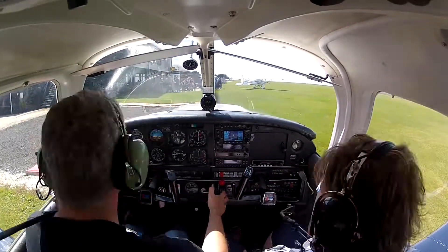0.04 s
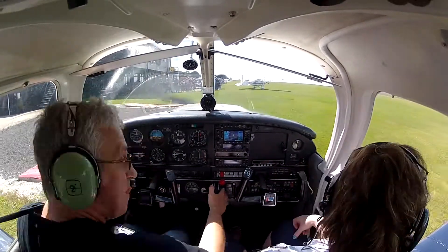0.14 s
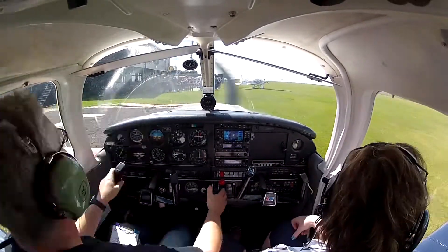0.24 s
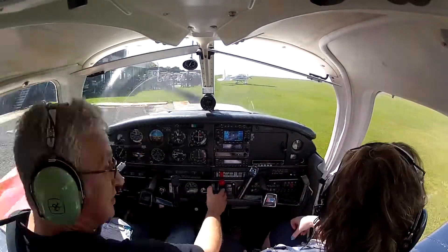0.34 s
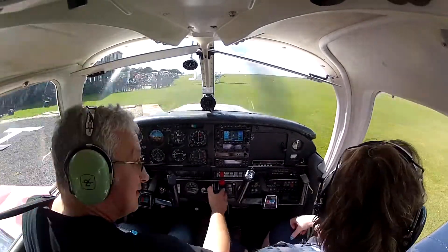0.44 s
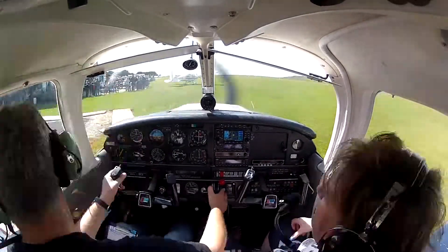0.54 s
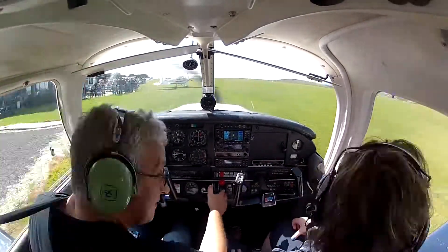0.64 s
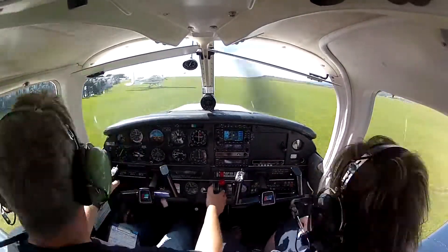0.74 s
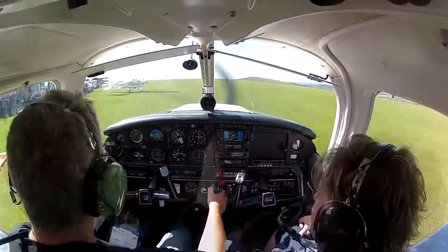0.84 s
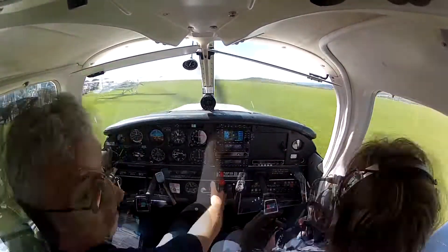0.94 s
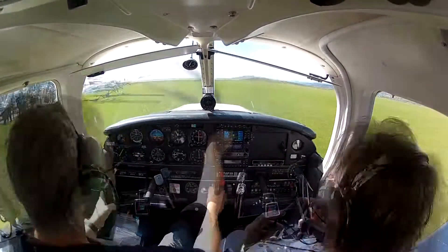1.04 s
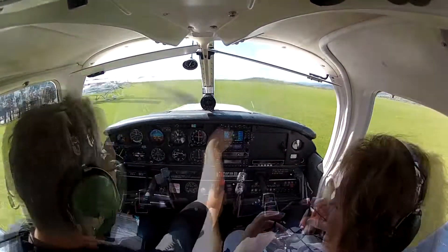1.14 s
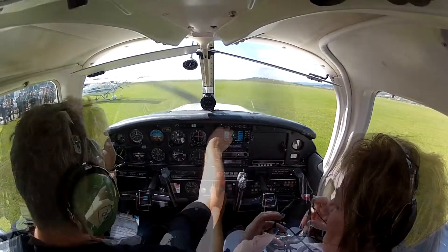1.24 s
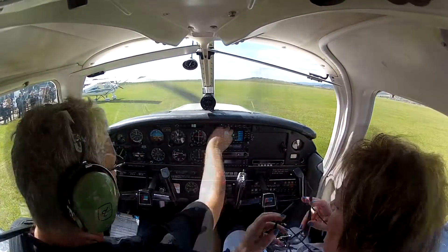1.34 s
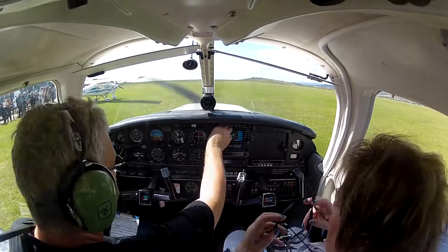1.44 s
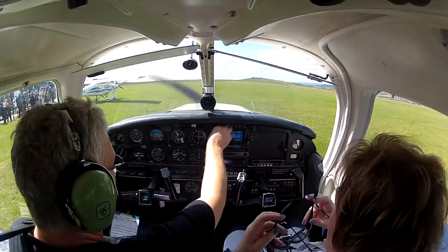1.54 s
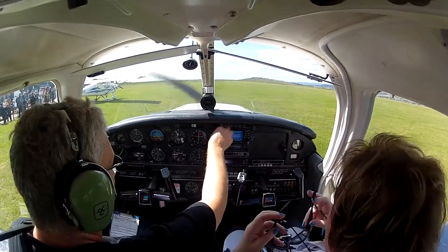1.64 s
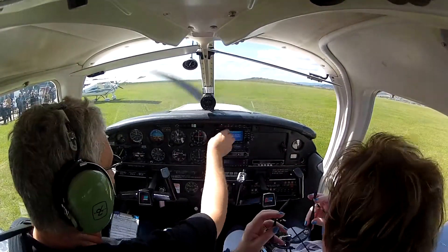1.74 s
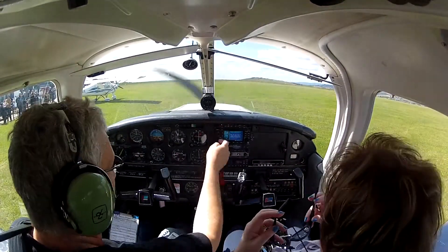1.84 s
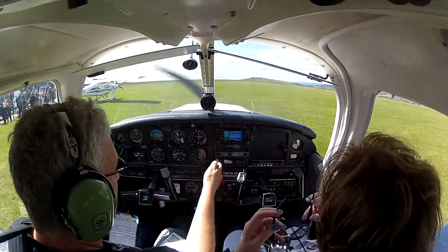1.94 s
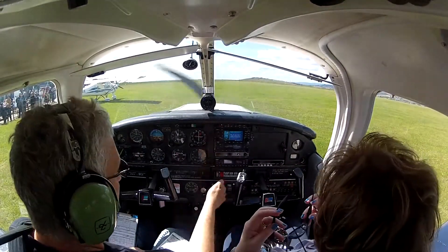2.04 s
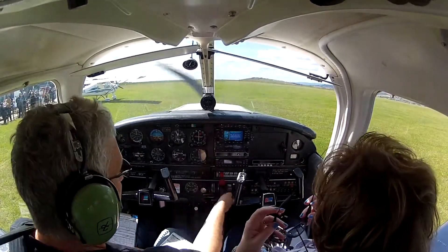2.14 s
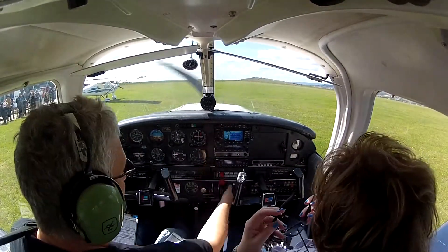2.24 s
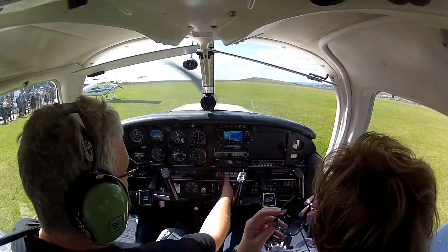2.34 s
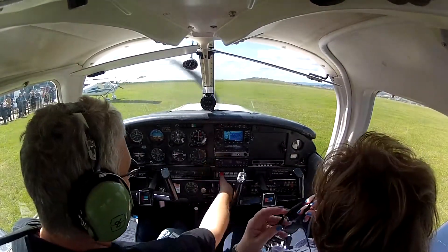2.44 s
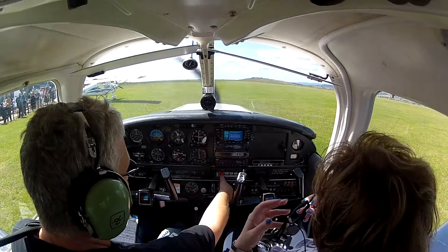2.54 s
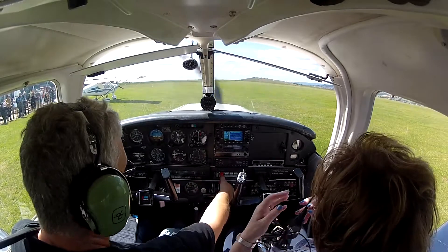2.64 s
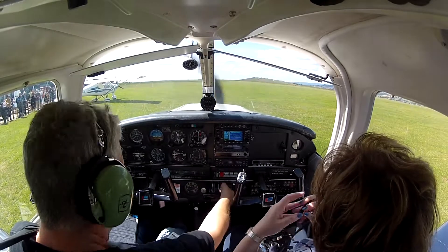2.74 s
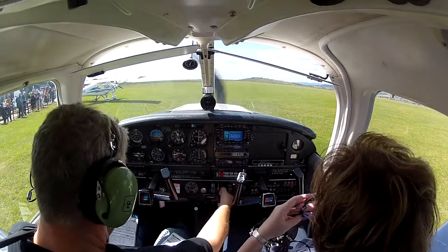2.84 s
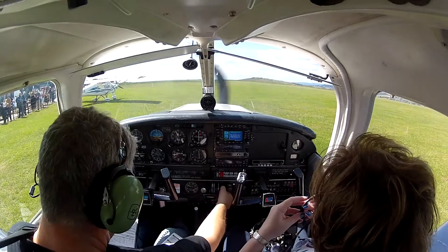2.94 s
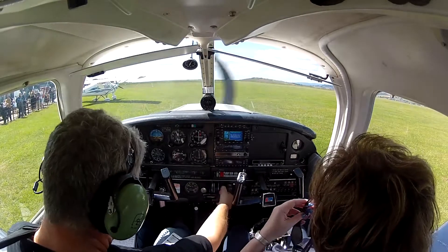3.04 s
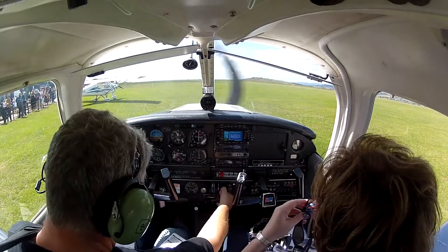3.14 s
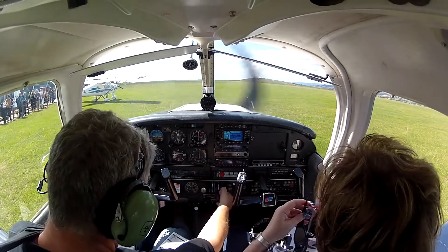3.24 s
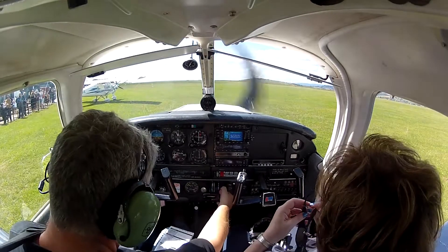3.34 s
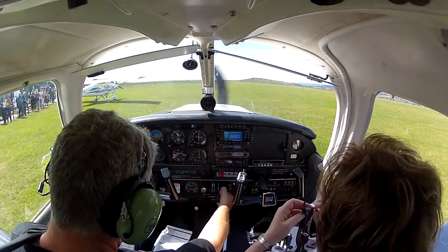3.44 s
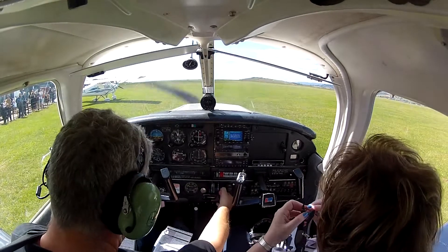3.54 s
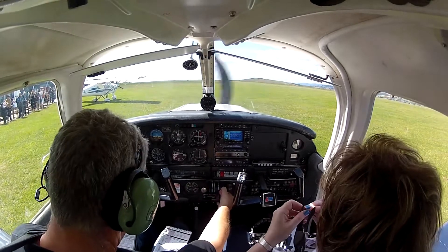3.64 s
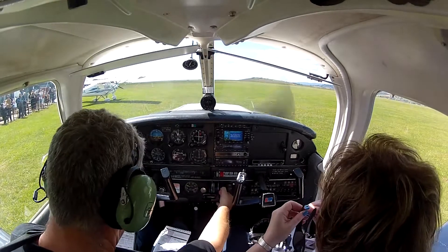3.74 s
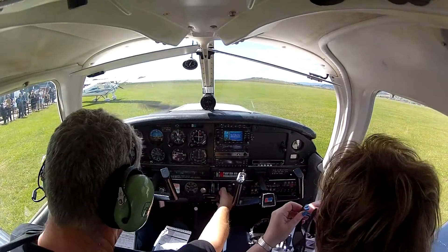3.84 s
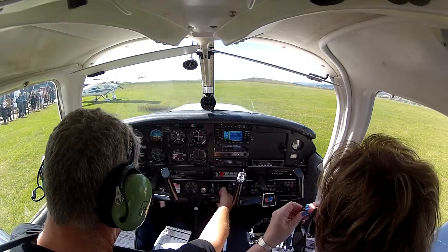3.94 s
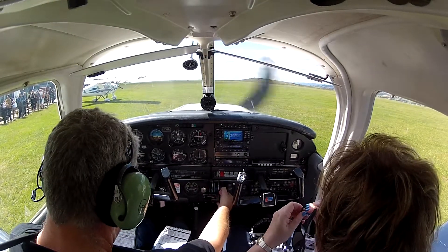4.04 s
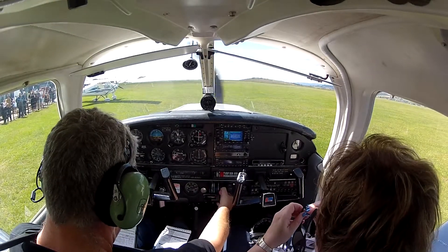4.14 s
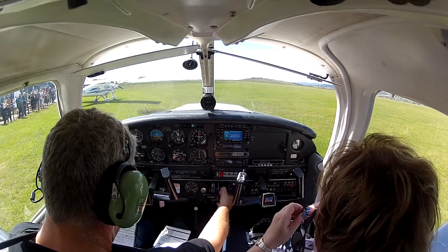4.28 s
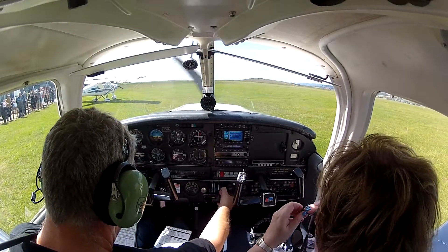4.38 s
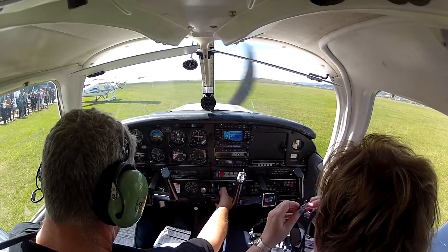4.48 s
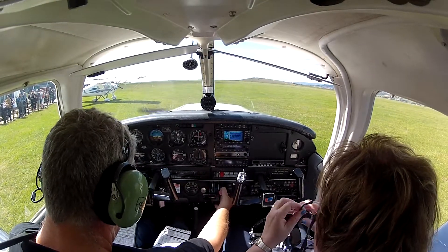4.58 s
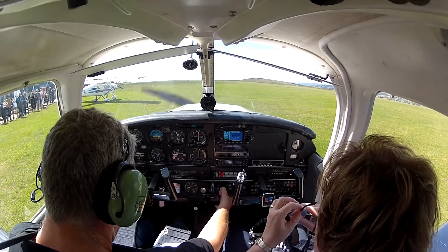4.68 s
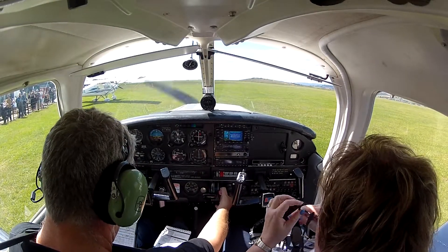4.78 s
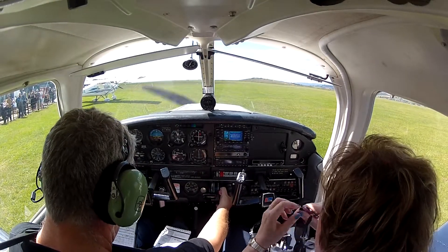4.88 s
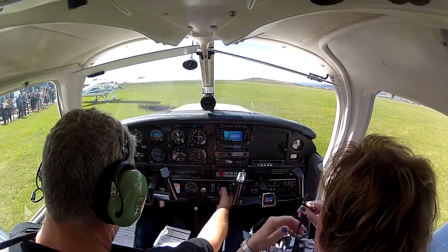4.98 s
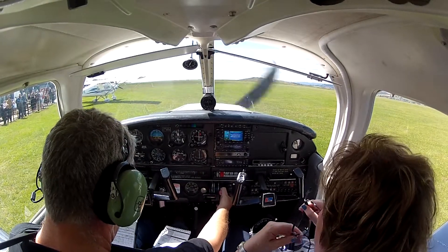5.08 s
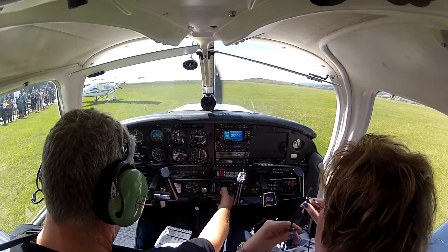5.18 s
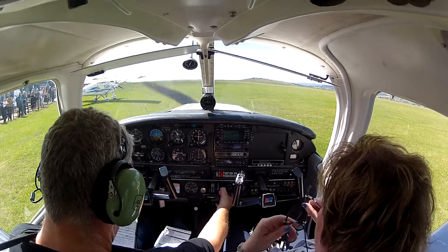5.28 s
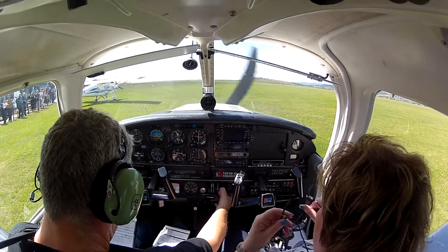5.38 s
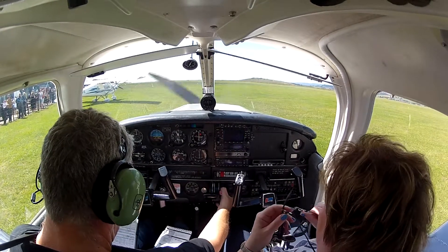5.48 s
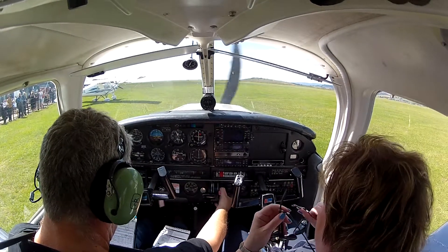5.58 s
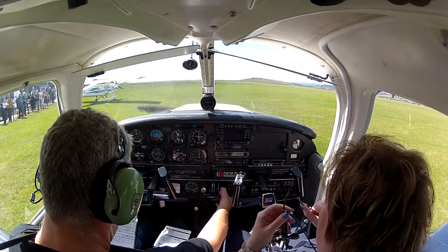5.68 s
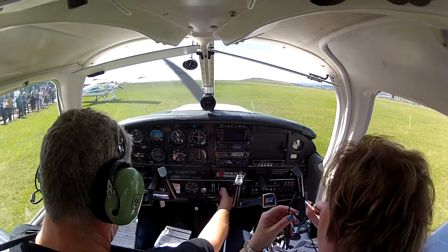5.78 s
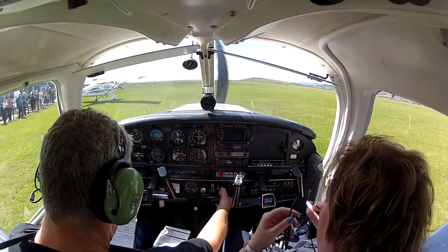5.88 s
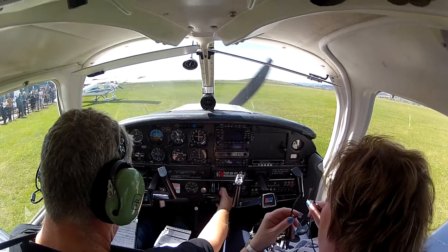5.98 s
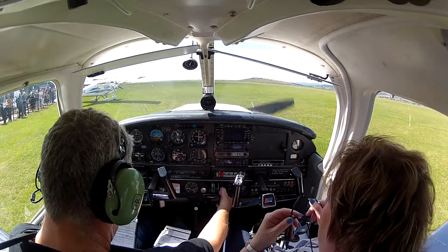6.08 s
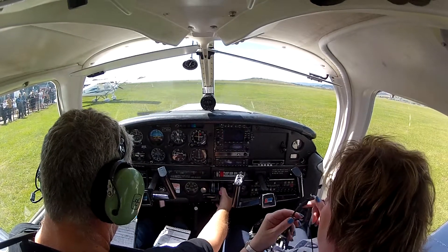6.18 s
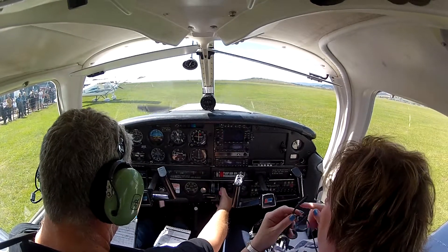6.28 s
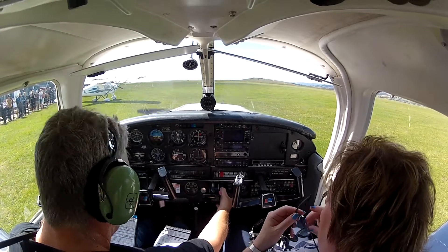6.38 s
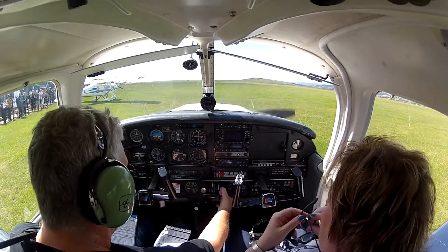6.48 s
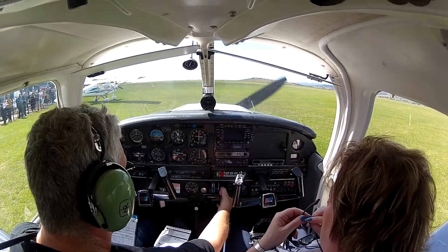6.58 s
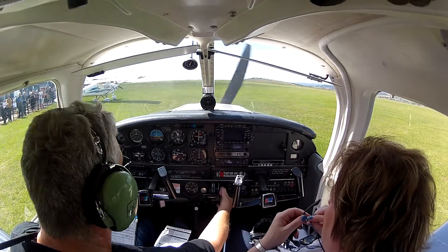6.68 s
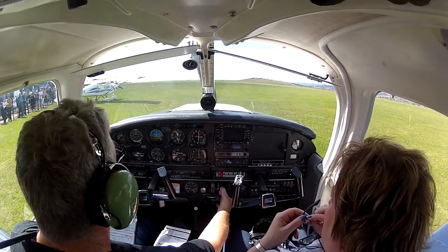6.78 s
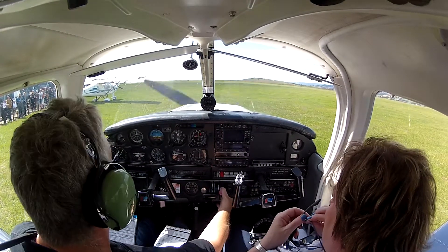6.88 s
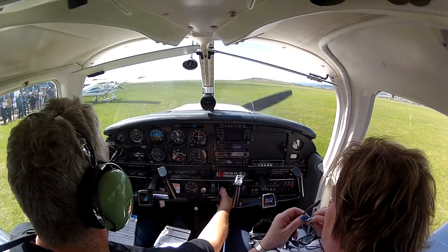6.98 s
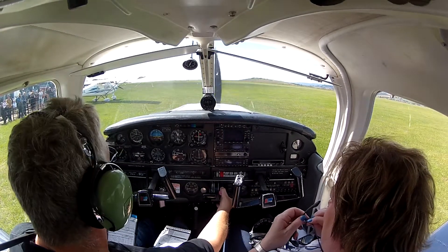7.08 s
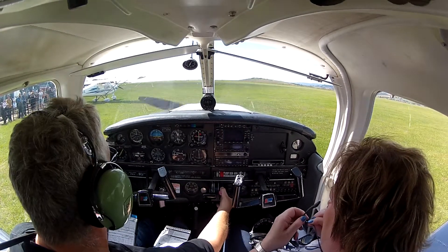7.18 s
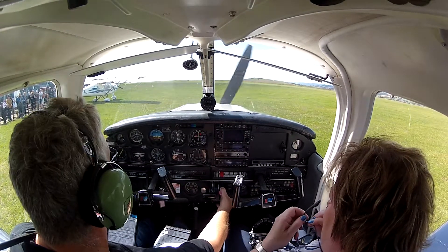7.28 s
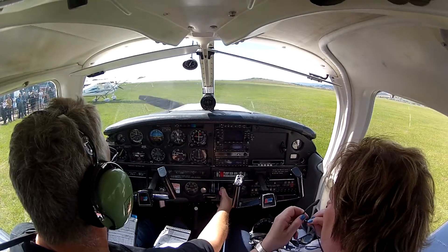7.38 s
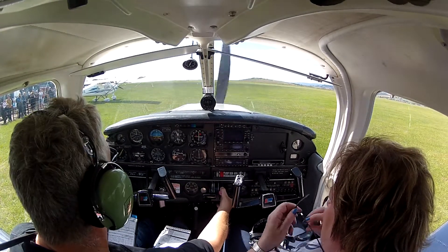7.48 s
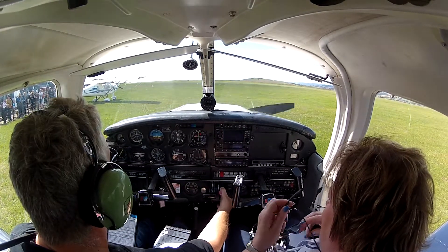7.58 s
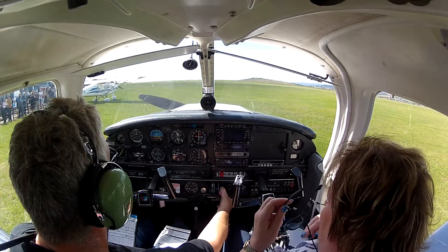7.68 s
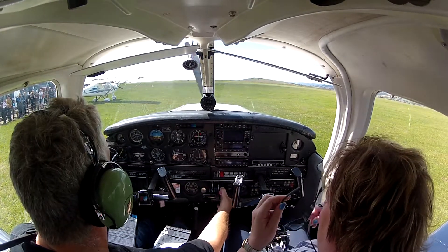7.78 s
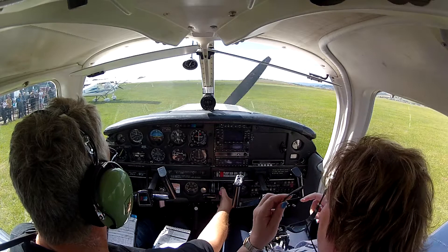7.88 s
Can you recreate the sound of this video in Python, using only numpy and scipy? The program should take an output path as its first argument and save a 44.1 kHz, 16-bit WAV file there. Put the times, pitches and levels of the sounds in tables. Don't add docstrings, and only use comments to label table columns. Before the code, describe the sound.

Inside a small propeller plane, a loud throbbing idle fades in, loses power, slows to separate chugs and clacks, leaving thin gyro whine.

```python
import sys
import numpy as np
from scipy import signal
from scipy.fft import rfft, irfft, next_fast_len
from scipy.io import wavfile
from scipy.ndimage import map_coordinates

SR = 44100
rng = np.random.default_rng(int(sys.argv[2]) if len(sys.argv) > 2 else 0)


def boost(x):
    u = np.asarray(x, float) / 20
    return 10 ** u


def persist_wave(psi):
    counts = np.round(np.clip(psi, -1, 1) * 32767).astype(np.int16)
    wavfile.write(sys.argv[1], SR, np.atleast_2d(counts).T)


N = 349139

# frequency in Hz, density in dB per Hz.
RUMBLE = [(7, -38), (14, -35), (38, -2), (64, 1), (96, 1), (120, -4), (184, -5.5), (254, -6), (300, -19),
          (380, -19.5), (500, -19), (840, -120)]
# frequency in Hz, density in dB per Hz.
THUMP = [(210, -36), (350, -11.5), (900, 0.5), (1080, -5), (1220, -12.5), (1370, -12), (2020, -10.5),
         (2800, -29), (3500, -25), (4550, -53), (7700, -120)]
CYLINDERS = [-0.22, -2.3, -1.3, -0.25]


def unit(x):
    return x / np.sqrt(np.mean(x ** 2) + 1e-20)


def along(points, hz):
    f, v = np.transpose(points)
    return np.interp(np.log(hz + 1), np.log(f + 1), v)


def curve(rows):
    s, value = np.transpose(rows)
    return np.interp(np.arange(N) / SR, s, value)


def wobble(rate_hz):
    coarse = np.arange(0, N + 16, 16)
    knots = rng.standard_normal(int(N * rate_hz / SR) + 4)
    return np.interp(np.arange(N), coarse, map_coordinates(knots, [coarse * rate_hz / SR]))


def coloured(x, spectrum):
    m = next_fast_len(N + 8192)
    gain = boost(along(spectrum, np.fft.rfftfreq(m, 1 / SR)))
    return unit(irfft(rfft(x, m) * gain, m)[:N])


def add(track, s, sound):
    part = track[round(s * SR):][:len(sound)]
    part += sound[:len(part)]


def ring(modes, seconds, attack):
    t = np.arange(int(seconds * SR)) / SR
    phase = rng.uniform(0, 2 * np.pi, len(modes))
    total = sum(boost(db - 60 * t / t60) * np.sin(2 * np.pi * hz * t + p)
                for (hz, db, t60), p in zip(modes, phase))
    return (1 - np.exp(-t / attack)) * total


def bursts(events, t60, attack, spectrum):
    envelope, t = np.zeros(N), np.arange(SR // 6) / SR
    for s, db in events:
        add(envelope, s, boost(db - 60 * t / t60) * (1 - np.exp(-t / attack)))
    return envelope * coloured(rng.standard_normal(N), spectrum)


def strokes_db(turns, scatter_db):
    strokes = np.arange(int(turns[-1]) + 3)
    strength = scatter_db * rng.standard_normal(len(strokes)) + np.resize(CYLINDERS, len(strokes))
    return np.interp(turns, strokes, strength)


def puffs(turns, depth_db, scatter_db, lag):
    swell = depth_db * np.cos(2 * np.pi * (turns - lag))
    return boost(swell + strokes_db(turns - lag, scatter_db)) * rng.standard_normal(N)


def airframe_db(hz):
    # centre in Hz, width in Hz, level in dB.
    resonances = [(25.7, 6.9, -16), (38.06, 4, -11), (59.9, 2.7, -5.5), (64.6, 6.2, -9.5),
                  (84.53, 9.1, -11), (100, 14.4, -11)]
    f = hz[::64]
    response = sum(boost(db) * 1j * f * w / (c * c - f * f + 1j * f * w) for c, w, db in resonances)
    return np.interp(np.arange(N), np.arange(0, N, 64), 20 * np.log10(np.abs(response)))


def shaft_order(turns, coast, k, slip):
    return -np.cos(2 * np.pi * (k * turns + coast * rng.random()) + slip * wobble(3.06))


def suction_throb(rate, turns, coast, slowed, shake_rel_db):
    order_db = [-2, -0.4, -5.5, -7]
    unfired_db = [1.5, -2, -3, -0.5]
    fuel_cut_s, last_firing_s = 3.3, .06
    unfired = np.clip((np.arange(N) / SR - fuel_cut_s) / last_firing_s, 0, 1)
    loose = np.clip(-slowed - .5, 0, 1)
    push_db = 7.5 * slowed + .35 * shake_rel_db
    throb = np.zeros(N)
    for k, db, cut_db in zip((1, 2, 3, 4), order_db, unfired_db):
        level_db = db + cut_db * unfired + push_db + airframe_db(k * rate)
        level_db = level_db + (1.5 + 2.2 * loose) * wobble(16)
        throb += np.sqrt(2) * boost(level_db) * shaft_order(turns, coast, k, slip=0.29 + .7 * loose)
    return throb * boost(.55 * strokes_db(turns, scatter_db=1.6))


def airframe_shake(rate, turns, coast, shake_db):
    # multiple of the stroke rate, level in dB.
    upper_orders = [(.5, 12), (1.5, -5), (2.5, 7.5), (3.5, -9), (4.5, -3.5), (5, 9), (5.5, 0.5), (6, 5),
                    (7, 0), (8, -9), (9, -13), (10, -6.5), (12, -14.5)]
    # frequency in Hz, gain in dB.
    boom = [(15, 2), (40, -22), (60, 7), (80, -4.5), (100, 5.5), (125, 10.5), (150, -0.5), (200, 0),
            (300, -3.5), (500, 14.5)]
    # frequency in Hz, density in dB per Hz.
    mounts = [(20, -36), (45, -1), (70, 11), (120, 1), (190, -26.5)]
    orders = sum(boost(db + along(boom, k * rate) + 1.94 * wobble(10)) * shaft_order(turns, coast, k, slip=0.82)
                 for k, db in upper_orders)
    rumble = coloured(puffs(turns, depth_db=-0.5, scatter_db=0.0, lag=.1), RUMBLE)
    rocking = coloured(puffs(turns, depth_db=2.0, scatter_db=4.0, lag=0.48), mounts)
    shake = boost(-9.5 - 2.8 * coast) * orders
    shake += boost(2.5 + 1.2 * coast) * rumble
    shake += boost(-3) * (0.59 + 0.63 * coast) * rocking
    return boost(shake_db) * shake


def panel_buzz(turns, coast, slowed, shake_rel_db):
    # frequency in Hz, density in dB per Hz.
    panels = [(180, -42), (300, 1.5), (378, -2.5), (486, 1), (650, -6), (755, -2.5), (942, -3),
              (1020, -8.5), (1090, -0.5), (1230, -14), (1440, -10), (1590, -17.5), (2020, -19),
              (2190, -20.5), (3300, -41), (4290, -65), (7260, -120)]
    # frequency in Hz, density in dB per Hz.
    cowling = [(700, -21), (860, -8), (960, 5.5), (1080, -1.5), (1300, -28)]
    buzz_db = -26.5 + 5 * slowed + 0.29 * shake_rel_db
    noise = puffs(turns, depth_db=1.0, scatter_db=0.13, lag=0.011)
    buzz = boost(buzz_db + 1.65 - 1.84 * coast + 0.36 * wobble(14)) * coloured(noise, panels)
    cam_db = 5.0 * np.cos(2 * np.pi * (turns + 0.64) / len(CYLINDERS))
    firing_db = 6 * np.cos(2 * np.pi * (turns - .05))
    cam = boost(cam_db + firing_db) * rng.standard_normal(N)
    chug = (1 - coast) * boost(buzz_db - 8.0) * coloured(cam, cowling)
    return buzz + chug


def engine():
    # time in seconds, rate in strokes per second.
    speed = [(.95, 40.1), (2.6, 40.3), (3.1, 40.55), (3.25, 41.2), (3.41, 38.5), (3.72, 33.1), (4.12, 27.6),
             (4.49, 23.0), (5.03, 18.6), (5.65, 15.7), (6.39, 11.7), (7.9, 3.47)]
    # time in seconds, level in dB.
    shaking = [(1, -23.5), (1.6, -22), (2.9, -24), (3.25, -22.5), (3.6, -26), (3.9, -29), (4.3, -29.5),
               (4.75, -31.5), (5.03, -26.5), (5.42, -20), (5.65, -22.5), (5.85, -31.5), (6.25, -36),
               (6.6, -31), (6.75, -28), (6.95, -32), (7.15, -39), (7.55, -48.5)]
    idle_hz, usual_db = 40, -28
    rate, shake_db = curve(speed), curve(shaking)
    slowed = np.log2(rate / idle_hz)
    turns = np.cumsum(rate) / SR + 3.85
    coast = np.clip((39 - rate) / 6, 0, 1)
    shake_rel_db = shake_db - usual_db
    motor = suction_throb(rate, turns, coast, slowed, shake_rel_db)
    motor = motor + airframe_shake(rate, turns, coast, shake_db)
    motor = motor + panel_buzz(turns, coast, slowed, shake_rel_db)
    return motor, turns, coast


def gyros(coast):
    whine_hz = [1963, 2057, 1685, 2659, 2993, 3466, 3655, 3752, 3800, 3894, 4228, 4527, 5179]
    # rms level in dB, width in Hz.
    whine_rows = [(-48, 13), (-47.5, 8.8), (-64, 5), (-57, 4.4), (-56, 6.7), (-52.5, 2.5), (-51, 2.5),
                  (-58, 6.1), (-57, 4.5), (-51, 2.5), (-55, 3.7), (-56.5, 5.7), (-55, 7.6)]
    squeal_hz = [4015, 4052]
    # time in seconds, gain in dB.
    swells = [
        (2.91, 10),
        (3.35, 9),
        (4.2, 5),
        (5.4, 6),
        (6.56, 4.5),
        (7.2, 6.5),
        (7.72, 3.5),
        (7.92, 7),
    ]
    # frequency in Hz, density in dB per Hz.
    air = [(880, -51), (1500, -13), (1770, -11), (2010, 1.5), (2180, -6), (2800, -9), (2950, -12),
           (3210, -7.5), (3900, -6.5), (4800, -5.5), (5250, -5), (5910, -3), (6200, -19), (8060, -66),
           (13600, -120)]
    # start in seconds, frequency in Hz, level in dB.
    panel_motor = (7.25, 237.3, -45.5)
    t = np.arange(N) / SR
    air_db = -46.5 + 1.5 * (1 - coast)

    worn_db = 0.95 * (t - 6) + 2.8 * wobble(14)
    whine = np.zeros(N)
    for hz, (level, width_hz) in zip(whine_hz, whine_rows):
        level_db = level + worn_db * (hz < 2500) + 0.23 * min(width_hz, 14) * wobble(21)
        whine += boost(level_db) * np.cos(2 * np.pi * hz * t + 1.04 * wobble(2 * width_hz))

    swell_s = .08
    squeal_db = -61 + 1.35 * t + sum(db * np.exp(-((t - s) / swell_s) ** 2) for s, db in swells)
    squeal = sum(boost(squeal_db + 0.4 + 2.2 * wobble(28)) * np.cos(2 * np.pi * hz * t + 1.5 * wobble(30))
                 for hz in squeal_hz)

    hiss = boost(1.6 * wobble(18)) * coloured(rng.standard_normal(N), air)
    start_s, motor_hz, hum_db = panel_motor
    hum = np.sin(2 * np.pi * motor_hz * t + 0.55 * wobble(9))
    hum = np.clip((t - start_s) / 0.095, 0, 1) * boost(hum_db + 3.5 + 1.5 * wobble(25)) * hum
    return boost(air_db) * (boost(46.0) * whine + boost(2.5) * hiss) + squeal + hum


def trim(turns):
    # frequency in Hz, density in dB per Hz.
    chatter_tone = [(710, -43), (1200, -21.5), (1610, -9), (2120, -1), (2810, -6), (4520, -2), (5520, 2.5),
                    (5950, 3), (6200, -6), (8060, -42), (13600, -120)]
    # frequency in Hz, density in dB per Hz.
    tick_tone = [(1500, -38), (2700, -4), (3600, -17), (4700, -1.5), (5300, -6), (5900, -10)]
    # time in seconds, peak level in dB.
    tick_rows = [(3.0512, -26), (3.3613, -17.5), (3.387, -15), (3.413, -17.5), (3.4626, -20),
                 (3.4895, -19.5), (3.5416, -24), (4.2245, -33), (4.3568, -25), (4.734, -27), (5.0659, -28),
                 (5.097, -23.5)]
    rattle_s, rise_s, hold_s, fall_s = 5.1, .17, .31, .13
    corners = np.cumsum([rattle_s - .1, .1, rise_s, hold_s, fall_s, .1])
    db = -34 - 20 * np.interp(np.arange(N) / SR, corners, [3, 1, 0, 0, .5, 3])
    db = db + 0.5 * np.cos(2 * np.pi * (turns - .3))
    grains_db = 4.5 * np.clip(wobble(300), -2, 1.6)
    chatter = boost(db + 1.4 + 2.1 * wobble(45) + grains_db) * rng.standard_normal(N)

    ticks, t = np.zeros(N), np.arange(SR // 40) / SR
    for s, peak_db in tick_rows:
        for late, loss_db in ((0, -1), (.006, -7)):
            add(ticks, s + late, boost(peak_db + loss_db - 60 * t / 0.013) * rng.standard_normal(len(t)))
    return chatter.std() * coloured(chatter, chatter_tone) + ticks.std() * coloured(ticks, tick_tone)


def knocks():
    # time in seconds, peak level in dB.
    upper = [(3.728, -31), (3.793, -21), (3.853, -39), (3.958, -30), (4.061, -20.5), (4.202, -21),
             (4.718, -21.5), (4.919, -23.5), (5.131, -19.5), (5.243, -24), (5.485, -20), (5.552, -21),
             (5.613, -22), (5.75, -22), (5.959, -24), (6.174, -25.5), (6.252, -24.5), (6.329, -25),
             (6.43, -25.5), (6.533, -20), (6.777, -27), (6.81, -24.5), (6.956, -25), (7.007, -27.5)]
    # time in seconds, peak level in dB.
    lower = [(3.633, -33), (3.913, -28), (4.247, -22), (4.408, -27), (4.602, -22.5), (4.764, -27),
             (4.959, -21), (5.191, -23), (5.299, -25), (5.428, -17.5), (5.715, -21), (5.825, -24.5),
             (6.037, -21.5), (6.699, -27.5), (6.909, -30), (7.107, -26.5), (7.196, -39)]
    upper_hz, lower_hz, scatter = 1060, 863, 0.031
    hits = [(s, db, upper_hz) for s, db in upper] + [(s, db, lower_hz) for s, db in lower]
    out = bursts([(s, db - 10.5) for s, db, hz in hits], t60=0.13, attack=0.001, spectrum=THUMP)
    out += bursts([(s, db - 15.5) for s, db, hz in hits], t60=0.6, attack=0.0065, spectrum=RUMBLE)
    for (s, db, hz), detune in zip(hits, rng.standard_normal(len(hits))):
        hz = hz * (1 + scatter * detune)
        modes = [(hz, 0, .14), (1.2 * hz, -7, .1), (.46 * hz, -8, .07)]
        add(out, s, boost(db - 4.0) * ring(modes, .15, 0.0016))
    return out


def magnetos():
    # time in seconds, peak in dB, crack in dB, low modes in dB.
    clacks = [
        (6.53, -13, -18, -26),
        (6.813, -26.5, 3, -28),
        (6.909, -15.5, -5.5, -11),
        (7.211, -16.5, 1.5, -14),
        (7.414, -15, -25, -24),
        (7.683, -15, -35, -17),
        (7.832, -34, -23, -9),
    ]
    # frequency in Hz, level in dB, t60 in seconds.
    case = [(432, 4.5, 0.12), (484, 0, 0.031), (695, 8.5, 0.019), (790, -7, 0.054), (900, 1, 0.088),
            (1050, -10, 0.068), (1090, -5, 0.13), (1370, -2.5, 0.097), (1830, -11, 0.16),
            (2330, -5.5, 0.066), (2720, -13, 0.035)]
    out = bursts([(row[0], row[1] - 9) for row in clacks], t60=0.15, attack=0.0011, spectrum=THUMP)
    t = np.arange(SR // 12) / SR
    for s, db, crack_db, low_db in clacks:
        for late, loss_db in ((0, -2), (.009, -2), (.019, -6), (.033, -13)):
            modes = [(hz, level + rng.normal(0, 3.2) + (low_db + 14.0) * (hz < 600), t60)
                     for hz, level, t60 in case]
            add(out, s + late, boost(db + loss_db - 16.5) * ring(modes, .12, 0.00059))
        add(out, s, boost(db + crack_db - 8.0 - 60 * t / 0.15) * rng.standard_normal(len(t)))
    return out


def scene():
    # start in seconds, length in seconds, power of the quarter sine.
    fade_in = (0.71, 2.18, 1.5)
    motor, turns, coast = engine()
    s, length, power = fade_in
    fade = np.sin(np.pi / 2 * np.clip((np.arange(N) / SR - s) / length, 0, 1)) ** power
    return (fade * (motor + gyros(coast) + trim(turns) + knocks() + magnetos()))[None]


def top_cut(x):
    return signal.sosfilt(signal.butter(12, 15930, fs=SR, output="sos"), x)


def record(dry):
    hold_hz = 12000
    x = dry[0] / (1 + np.abs(dry[0] / 1.03) ** 5) ** (1 / 5)
    x = signal.sosfiltfilt(signal.butter(8, 5700, fs=SR, output="sos"), x)
    held = np.repeat(signal.resample_poly(x, hold_hz, SR), 4)
    x = signal.resample_poly(held, SR, 4 * hold_hz)[1:]
    x = signal.sosfiltfilt(signal.cheby2(14, 50, 15900, fs=SR, output="sos"), x)
    return top_cut(np.pad(x, (0, 9))[None, :N])


dry = scene()
out = record(dry)
persist_wave(out)
```